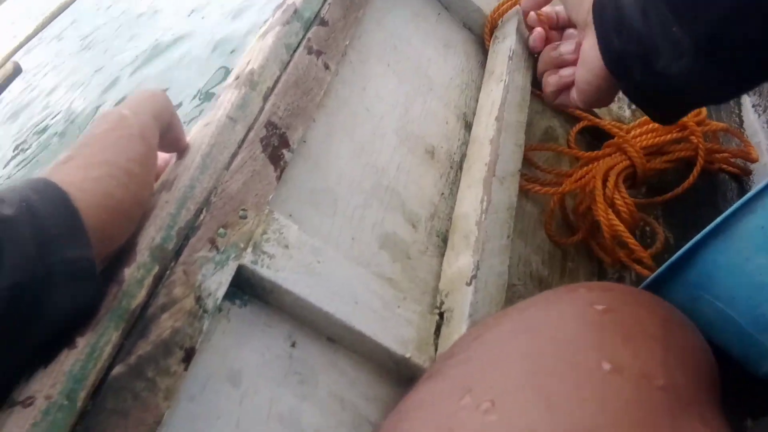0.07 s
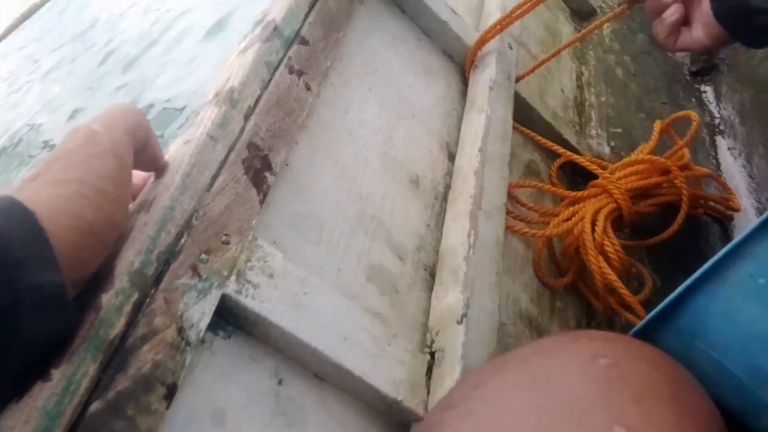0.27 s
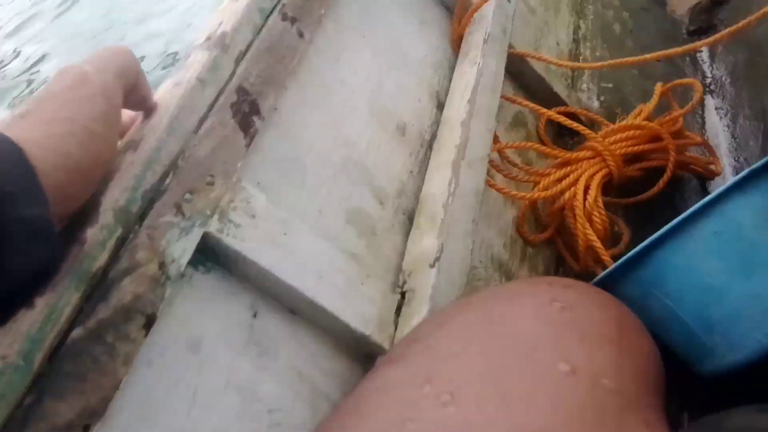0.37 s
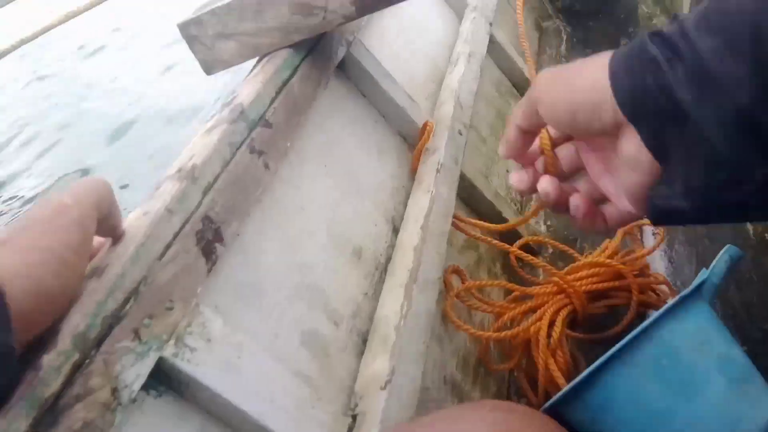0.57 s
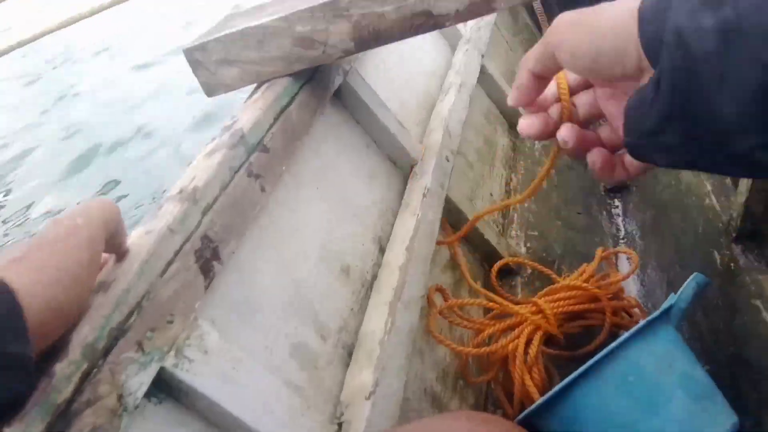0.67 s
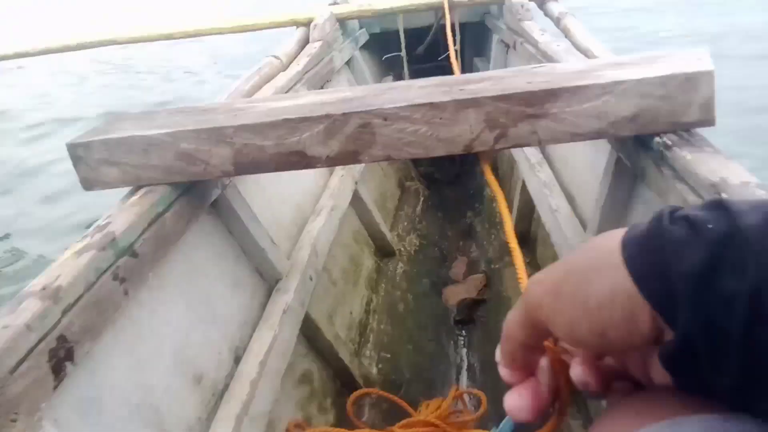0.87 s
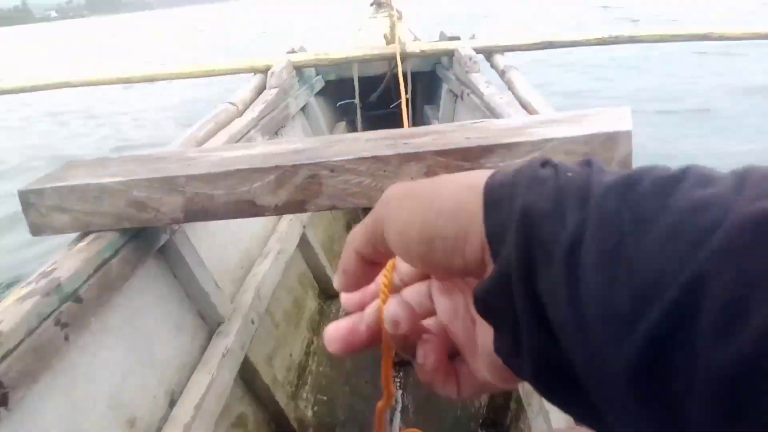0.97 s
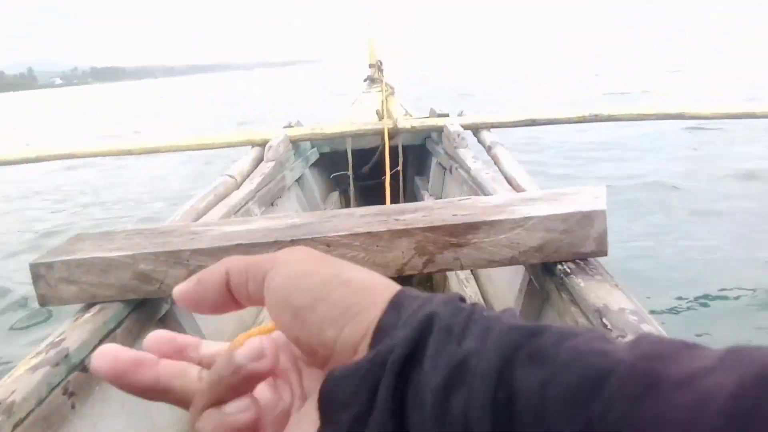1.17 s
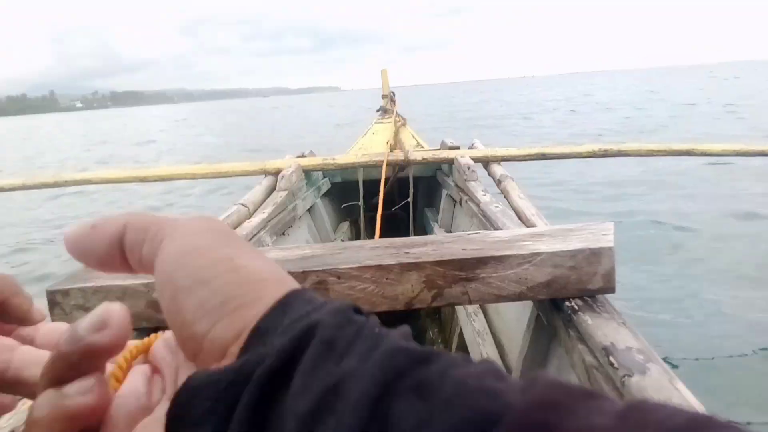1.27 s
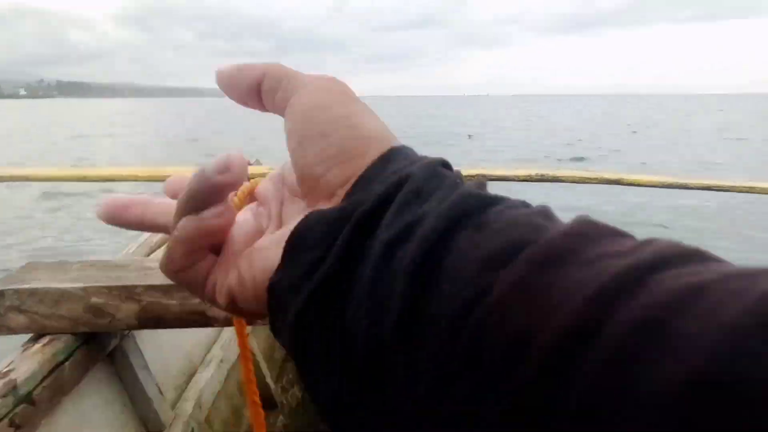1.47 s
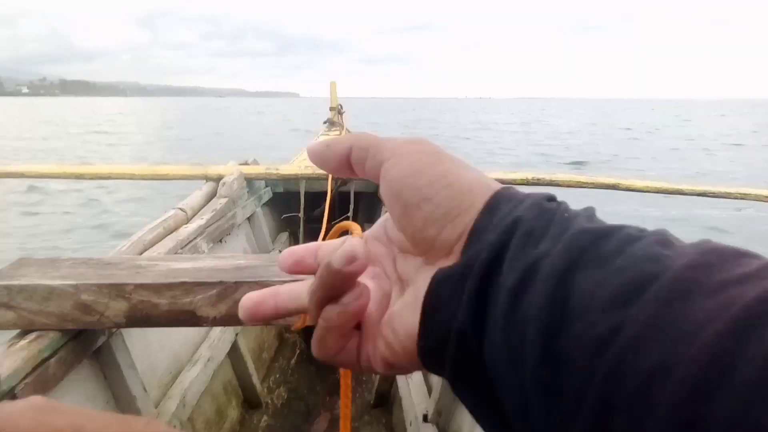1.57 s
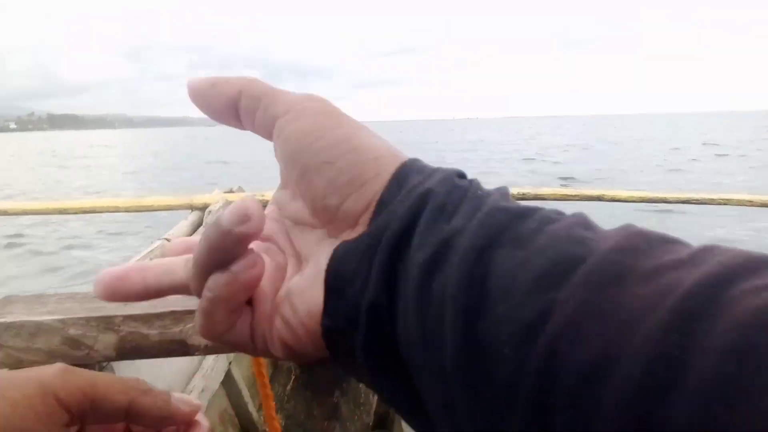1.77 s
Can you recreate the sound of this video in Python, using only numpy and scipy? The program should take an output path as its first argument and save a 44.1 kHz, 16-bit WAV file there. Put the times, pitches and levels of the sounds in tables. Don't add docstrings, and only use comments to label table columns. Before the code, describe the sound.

Close, muffled sound of rope hauled over a boat rail: a quiet start, a burst of knocks and slaps, more clatter midway, then the hardest double knock and a fading end over faint water wash.

```python
import sys
import numpy as np
from scipy import signal
from scipy.io import wavfile
from scipy.ndimage import uniform_filter1d

SR = 44100
rng = np.random.default_rng(int(sys.argv[2]) if len(sys.argv) > 2 else 0)


def elevation(decibels):
    levels = np.asarray(decibels, float)
    return 10 ** (levels / 20)


def inscribe(sig):
    pcm = np.round(np.clip(np.atleast_2d(sig).T, -1, 1) * 32767)
    wavfile.write(sys.argv[1], SR, pcm.astype(np.int16))


N = 81585

# pitch in Hz, width in Hz, level in dB.
RAIL_MODES = [(1267, 170, -3.5), (1750, 540, -3), (2050, 140, -5), (2500, 360, -20.5), (3200, 390, -21),
              (3700, 180, -18.5), (4460, 490, -26)]
UPPER, LOWER = 1.14, 0.82


def evened(x):
    return x / np.sqrt(np.mean(x ** 2) + 1e-20)


def smoothed(x, size):
    return uniform_filter1d(uniform_filter1d(x, size), size)


def curve(table, col):
    rows = np.array(table)
    return np.interp(np.arange(N) / SR, rows[:, 0], rows[:, col])


def colour(x, points):
    f, level = np.transpose(points)
    log_hz = np.log(np.fft.rfftfreq(4096, 1 / SR) + 1)
    half = np.interp(log_hz, np.log(f), level) * np.log(10) / 20
    full = np.concatenate([half, half[-2:0:-1]])
    taps = np.fft.ifft(np.exp(np.conj(signal.hilbert(full)))).real[:2048]
    return signal.oaconvolve(x, taps)[:len(x)]


def add(mix, s, sound):
    part = mix[round(s * SR):][:len(sound)]
    part += sound[:len(part)]


def resonate(x, hz, width):
    turn = np.exp(2j * np.pi * np.cumsum(hz * np.ones(len(x))) / SR)
    r = np.exp(-np.pi * width / SR)
    return 2 * (turn * signal.lfilter([1 - r], [1, -r], x / turn + 1e-18)).real


def clicks(per_s, spread_db):
    size = elevation(spread_db * np.minimum(rng.exponential(1, N), 4)) * rng.standard_normal(N)
    return evened(size * (rng.random(N) < per_s / SR))


def wood(x):
    # frequency in Hz, level in dB.
    scrape_colour = [(200, -21.5), (500, -4.5), (900, 10), (1300, 3), (2000, 13.5), (2800, 7.5),
                     (3700, 6.5), (5000, -3.5)]
    ring = sum((-1) ** k * elevation(db) * resonate(x, hz, w) for k, (hz, w, db) in enumerate(RAIL_MODES))
    return colour(x + elevation(-8.5) * 2 * ring, scrape_colour)


def wash():
    # frequency in Hz, level in dB.
    wash_colour = [(15, -49.5), (25, -12), (118, 7), (355, 7.5), (499, -6.5), (617, 0.5), (1640, -20.5),
                   (2030, -43.5), (4000, -22.5), (4600, -45), (8800, -120)]
    level_db, swell_db = -46.5, 1.5
    swell = evened(smoothed(rng.standard_normal(N), 2500))
    noise = colour(rng.standard_normal(N), wash_colour + [(6000, -46)])
    return elevation(level_db + swell_db * swell) * evened(noise)


def thuds():
    # start in seconds, peak in dB, pitch in Hz.
    pushes = [
        (0.091, -41, 85.5),
        (0.469, -31.5, 111),
        (0.613, -35, 74.6),
        (0.699, -36, 100),
        (0.834, -48.5, 104),
        (1.016, -44.5, 108),
        (1.289, -46, 107),
        (1.38, -44.5, 75.4),
        (1.53, -44, 80.8),
        (1.705, -44.5, 76.7),
    ]
    rise_s, t60, gain_db = 0.012, 0.28, 6
    out, t = np.zeros(N), np.arange(12000) / SR
    for s, db, hz in pushes:
        shape = elevation(db + gain_db - 60 * t / t60) * np.minimum(t / rise_s, 1) ** 2
        add(out, s, shape * np.sin(2 * np.pi * hz * t))
    return out


def hull():
    # time in seconds, force in dB, panel pitch in Hz.
    load = [(0, -54.5, 170), (.14, -56, 136.6), (.22, -44.5, 216.2), (.27, -28.5, 232), (.36, -19.5, 212.7),
            (.41, -25.5, 183.6), (.48, -28, 142.5), (.56, -40, 145), (.63, -37, 150.4), (.74, -53, 168.8),
            (.87, -49, 150.4), (.96, -58, 235.4), (1.21, -65, 202), (1.4, -61, 256), (1.45, -42.5, 296.7),
            (1.52, -51, 181), (1.85, -64, 205)]
    # hull mode pitch in Hz, width in Hz, level in dB.
    hull_modes = [(80, 40, -9), (146, 18, -3), (245, 25, -6)]
    bumps = clicks(980, 0.8)
    panel = resonate(bumps, curve(load, 2), 25)
    modes = sum(elevation(db) * evened(resonate(bumps, hz, w)) for hz, w, db in hull_modes)
    low = colour(evened(panel) + modes, [(30, -38.5), (80, -5.0), (302, -11.5), (600, -18.0), (2000, -85)])
    return elevation(curve(load, 1)) * evened(low)


def knocks():
    # start in seconds, peak in dB, pitch in Hz, fade time (60 dB) in seconds.
    blows = [(0.243, -11, 461, 0.11), (0.406, -8, 838, 0.037), (0.415, -15.5, 692, 0.036),
             (.421, -13, 473, 0.041), (0.485, -19.5, 740, 0.066), (0.61, -19.5, 687, 0.031),
             (0.867, -14.5, 1022, 0.044), (0.877, -14.5, 765, 0.058), (0.909, -30, 940, 0.066),
             (0.93, -17.5, 822, 0.044), (0.95, -16, 926, 0.056), (0.961, -18.5, 786, 0.062),
             (1.328, -5, 710, 0.056), (1.339, -4, 672, 0.044), (1.347, -11, 653, 0.097),
             (1.36, -16, 657, 0.22), (1.374, -18.5, 452.8, 0.23), (1.419, -5, 647, 0.022),
             (1.43, -7, 619, 0.064), (1.495, -32.5, 617, 0.12), (1.514, -20, 639, 0.055),
             (1.521, -24, 686, 0.061), (1.548, -25, 634, 0.057), (1.569, -22.5, 653, 0.11),
             (1.771, -32, 613, 0.27)]
    # start in seconds, peak in dB, pitch in Hz, fade time in seconds.
    groans = [
        (.665, -32, 337.8, 0.33),
        (0.726, -22.5, 338.4, 0.22),
        (1.436, -23.5, 301, 0.16),
        (.295, -19.5, 405, .12),
        (.51, -29, 572, 0.13),
        (.95, -35, 314, 0.26),
        (1.62, -33.5, 384, 0.18),
        (1.79, -35, 402, .2),
    ]
    rise_s, gain_db = 0.0013, -3.5
    out, t = np.zeros(N), np.arange(9000) / SR
    for s, db, hz, t60 in list(blows) + list(groans):
        above = np.sin(2 * np.pi * hz * UPPER * t)
        below = np.sin(2 * np.pi * hz * LOWER * t)
        trio = np.sin(2 * np.pi * hz * t) + elevation(-7.5) * (above + elevation(-12.5) * below)
        fade = elevation(db + gain_db - 60 * t / max(t60, .01))
        add(out, s, fade * (1 - np.exp(-t / rise_s)) * trio)
    return out


def rattle():
    # time in seconds, force in dB, plank pitch in Hz.
    run = [(0, -50, 467), (.17, -65.5, 398), (.28, -34.5, 657), (.42, -33.5, 591), (.52, -38, 410),
           (.6, -53, 266), (.68, -35, 333), (.77, -35, 340.5), (.84, -53, 403), (.9, -41.5, 770),
           (1.05, -39, 726), (1.18, -42.5, 637), (1.27, -54, 565), (1.45, -36, 582.5), (1.57, -38.5, 674),
           (1.69, -44.5, 695), (1.78, -46, 543), (1.85, -45, 408)]
    width = 60
    taps, hz = clicks(700, 1.5), curve(run, 2)
    trio = resonate(taps, hz, width)
    trio = trio - 0.73 * resonate(taps, hz * UPPER, width)
    trio = trio - 0.62 * resonate(taps, hz * LOWER, width)
    return elevation(curve(run, 1)) * evened(resonate(trio, hz, 590))


def creaks():
    # start in seconds, peak in dB, pitch in Hz, fade time (60 dB) in seconds.
    judders = [(0.05, -43, 1290, 0.18), (.05, -47, 3800, 0.24), (0.407, -16, 1084, 0.072),
               (.467, -40, 2080, 0.067), (.485, -24.5, 1270, 0.11), (.5, -24.5, 974, 0.088),
               (.605, -46, 4650, 0.44), (.628, -43.5, 2100, .15), (.63, -44, 3530, 0.11),
               (.655, -45, 3470, 0.11), (.675, -43.5, 1990, 0.086), (.694, -39, 2050, 0.089),
               (.694, -42.5, 3700, 0.19), (0.822, -42, 1290, .15), (0.872, -30, 1370, .04),
               (.892, -28.5, 2070, 0.055), (1.068, -31.5, 1870, 0.072), (1.092, -36.5, 1895, .08),
               (1.14, -33, 1554, 0.31), (1.246, -45, 1440, 0.15), (1.386, -17.5, 1440, .04),
               (1.448, -46, 3520, 0.082), (1.46, -42, 1940, 0.17), (1.509, -45.5, 2650, 0.2),
               (1.511, -46, 1340, .15), (1.526, -42.5, 4050, .1), (1.528, -39, 2030, 0.062),
               (1.7, -38, 1144, 0.045), (1.699, -44, 2050, 0.036), (1.699, -43.5, 2950, .04),
               (1.712, -40.5, 1097, 0.15), (1.741, -36, 2500, 0.063), (1.742, -36, 1970, 0.067),
               (1.744, -41, 1380, 0.13), (1.815, -43, 1290, 0.38), (1.25, -44.5, 2290, 0.13),
               (1.812, -59, 1950, 0.13)]
    rise_s, gain_db = 0.0027, -5
    out, t = np.zeros(N), np.arange(6000) / SR
    for s, db, hz, t60 in judders:
        noise = rng.standard_normal(len(t))
        width = 0.073 * hz
        mode = evened(resonate(resonate(noise, hz, width), hz, 2 * width))
        fade = elevation(db + gain_db - 60 * t / max(t60, .01))
        add(out, s, fade * (1 - np.exp(-t / rise_s)) * mode)
    return out


def rope_hits(rows):
    hold, gain_db, snap_db = 0.078, -11, 12.5
    tail_db, tail_t60 = -11.5, 0.077
    tone_db, width = -5, 450
    out, t = np.zeros(N), np.arange(6000) / SR
    for s, db, hz, t60 in rows:
        noise = rng.standard_normal(len(t))
        snap = uniform_filter1d(elevation(snap_db) * (t == t[3]) * 0.025 / t60, size=6)
        crackle = noise * np.minimum(t / .0008, 1) + snap
        late = np.maximum(t - hold * t60, 0)
        burst = crackle * elevation(-60 * late / max(t60, .005)) + noise * elevation(tail_db - 60 * t / tail_t60)

        def ring(x):
            return resonate(resonate(x, hz, width), hz, 2 * width)

        both = wood(burst) / wood(noise).std() + elevation(tone_db) * ring(burst) / ring(noise).std()
        add(out, s, elevation(db + gain_db) * both)
    return out


def more_slaps():
    # start in seconds, peak in dB, bright pitch in Hz, fade time (60 dB) in seconds.
    more_loops = [
        (0.27, -23, 4900, 0.042),
        (.481, -27.5, 3430, 0.2),
        (.706, -33, 2080, 0.14),
        (.909, -28, 1200, 0.012),
        (1.145, -36.5, 2400, 0.068),
        (0.0064, -37.5, 3770, 0.2),
        (1.595, -43.5, 3600, 0.0178),
        (.8695, -10.5, 2050, 0.011),
        (.497, -30.5, 3500, 0.077),
    ]
    return rope_hits(more_loops)


def slaps():
    # start in seconds, peak in dB, bright pitch in Hz, fade time (60 dB) in seconds.
    loops = [(.2095, -40.5, 3700, 0.044), (.2425, -23.5, 3700, 0.015), (.249, -18.5, 1750, 0.02),
             (.2675, -14.5, 3200, 0.03), (.2805, -15.5, 1750, 0.019), (.338, -24, 3650, 0.23),
             (.3665, -14, 1750, 0.12), (.378, -15.5, 3090, 0.065), (.4075, -12, 1074, 0.0076),
             (.6105, -29.5, 2110, 0.0081), (.7315, -16, 1970, 0.058), (.734, -20, 3730, 0.047),
             (.8675, -15.5, 2050, 0.028), (1.526, -36.5, 2560, 0.047), (.929, -29.5, 2880, 0.0064),
             (.9465, -28, 2590, .02), (.9515, -13, 1800, 0.024), (.965, -19, 1840, 0.069),
             (1.023, -25.5, 1960, 0.021), (1.121, -24.5, 3870, 0.02), (1.194, -22.5, 2060, 0.037),
             (1.298, -31, 3410, 0.015), (1.3275, -14, 1636, 0.046), (1.36, -17, 1490, 0.045),
             (1.375, -20, 1580, .04), (1.386, -21, 1580, 0.056), (1.419, -19.5, 1850, 0.039),
             (1.699, -28, 1130, 0.011), (1.712, -32.5, 1185, 0.061), (1.7417, -34, 2030, 0.03)]
    return rope_hits(loops)


def drag():
    # time in seconds, effort in dB.
    effort = [(0, -54), (.1, -56.5), (.17, -69.5), (.3, -35), (.44, -47), (.5, -33.5), (.57, -69),
              (.63, -48), (.71, -53), (.8, -59.5), (.84, -51.5), (.9, -45), (1.01, -44), (1.19, -37.5),
              (1.24, -56), (1.28, -59.5), (1.4, -42), (1.53, -56), (1.63, -68), (1.78, -65), (1.85, -57.5)]
    # time in seconds, level in dB.
    thin_share = [(0, -3), (.15, -8.5), (.3, 1.5), (.5, 8.5), (.65, 5), (.85, -2), (1.0, 3), (1.12, -6.5),
                  (1.17, -2.5), (1.27, -7.5), (1.45, -0.5), (1.85, -7.5)]
    drift_db, clump_db = 3.5, 2.5
    rub = evened(wood(clicks(5800, 3)))
    chirps = np.zeros(N)
    for hz, w, db in RAIL_MODES:
        slips = clicks(500, 2)
        drift = evened(smoothed(slips, 2200))
        mode = resonate(resonate(slips, hz, 0.21 * w), hz, 2 * w)
        chirps = chirps + elevation(drift_db * drift + 0.5 * db) * (hz < 4200) * mode
    both = evened(rub + evened(chirps))
    thin = colour(both, [(2500, -25.5), (3800, -3), (5000, -2.5)])
    clumps = evened(smoothed(slips, 500))
    return elevation(curve(effort, 1) + clump_db * clumps) * (both + (elevation(curve(thin_share, 1)) - 1) * thin)


def scene():
    boat = thuds() + hull() + knocks() + rattle()
    rope = creaks() + more_slaps() + slaps() + drag()
    return (wash() + boat + rope)[None]


def low_pass(x):
    return signal.sosfilt(signal.butter(12, 15450, fs=SR, output="sos"), x)


def record(dry):
    # frequency in Hz, gain in dB.
    mic_colour = [(3800, -1.5), (4400, -9), (5000, -14.5), (5600, -28.5), (6500, -38.5), (7500, -56),
                  (15400, -63.5)]
    hiss_db, rise_db, edge_hz = -93, 24.5, 15450
    x = colour(dry[0], mic_colour)
    x = x + elevation(hiss_db) * (1 + elevation(rise_db) * x ** 2 * 10) * rng.standard_normal(N)
    x = signal.oaconvolve(x, signal.firwin(511, edge_hz, window=("kaiser", 9), fs=SR), "same")
    return low_pass(x[None])


dry = scene()
out = record(dry)
inscribe(out)
```